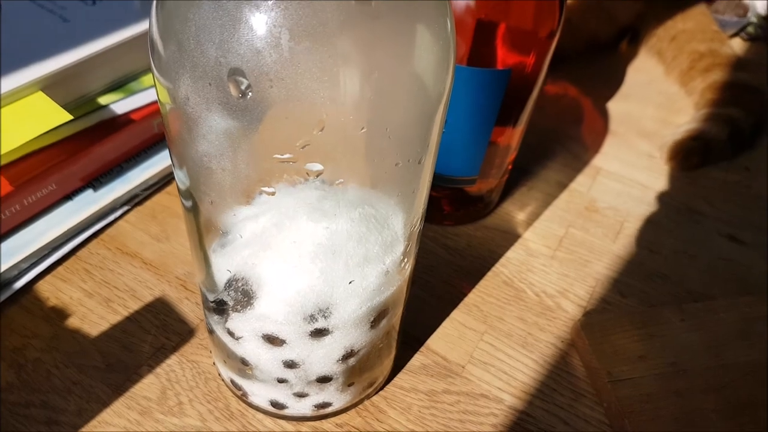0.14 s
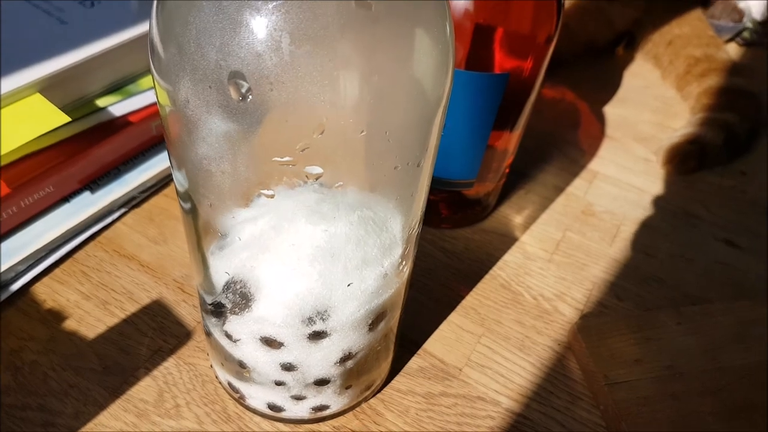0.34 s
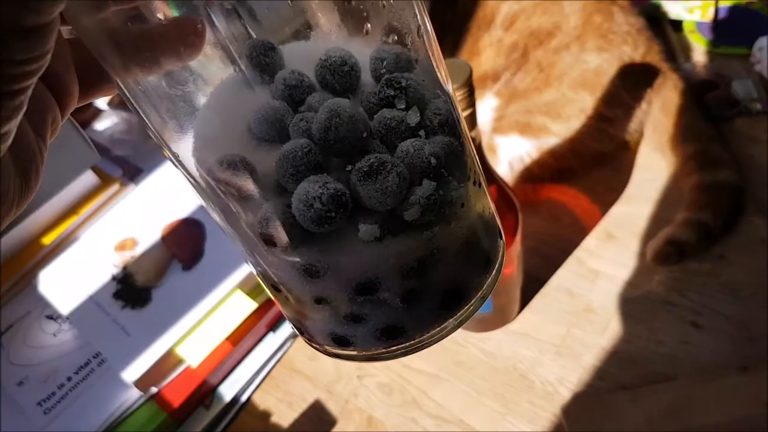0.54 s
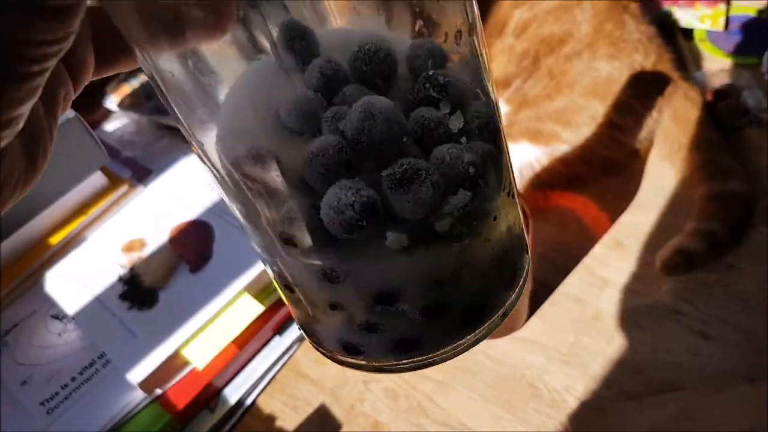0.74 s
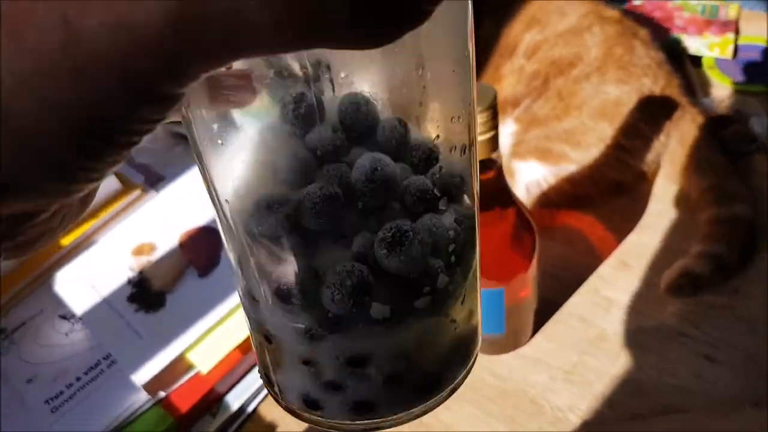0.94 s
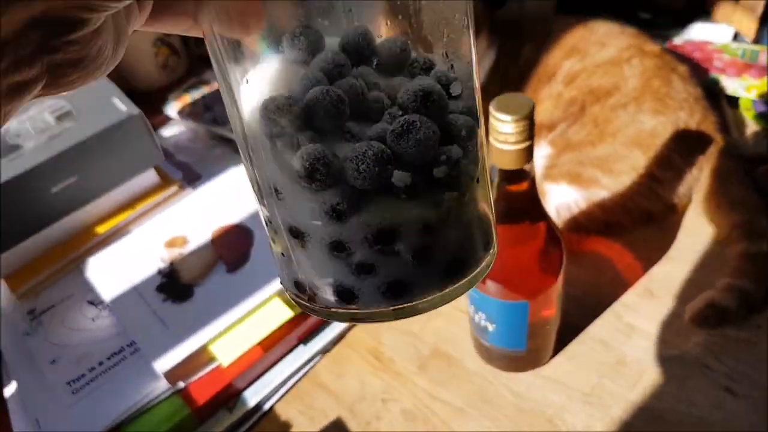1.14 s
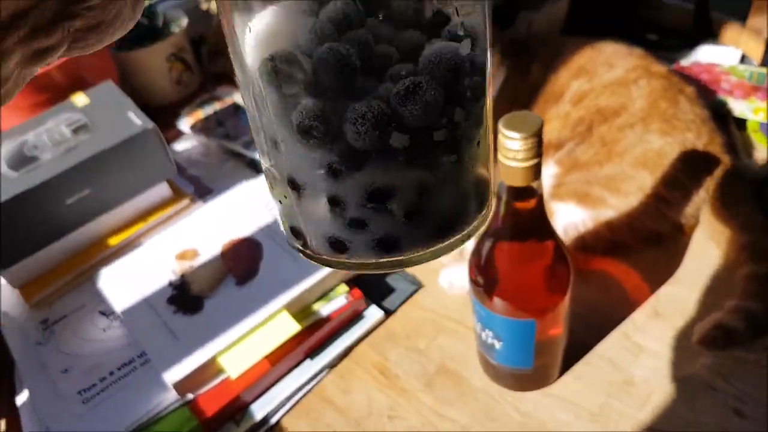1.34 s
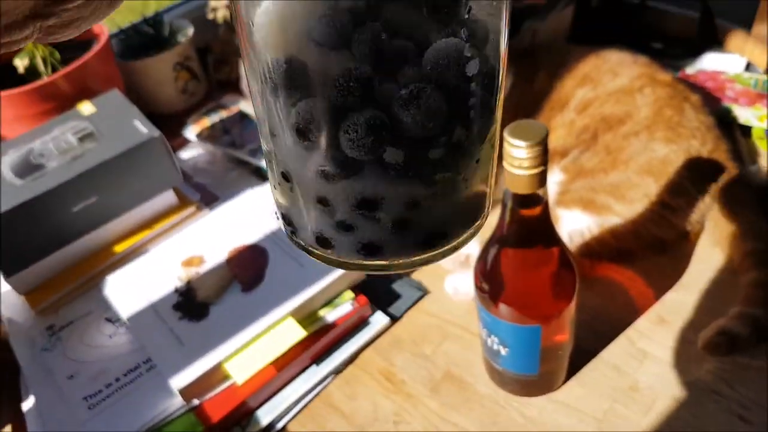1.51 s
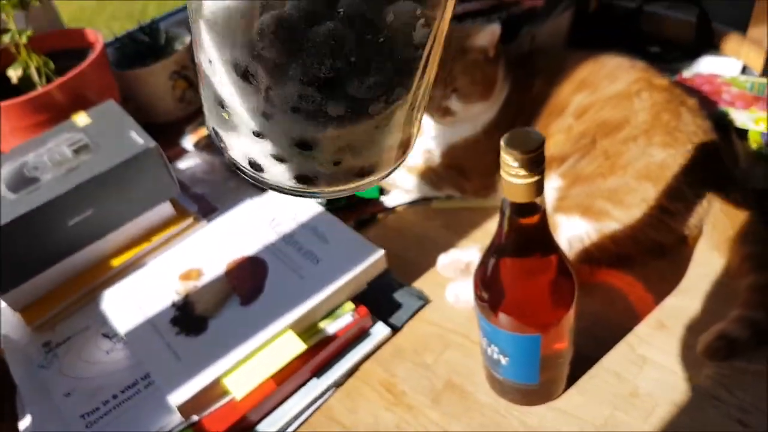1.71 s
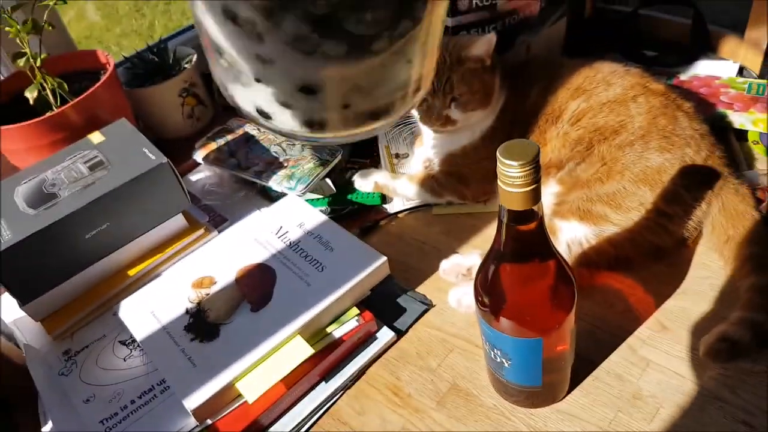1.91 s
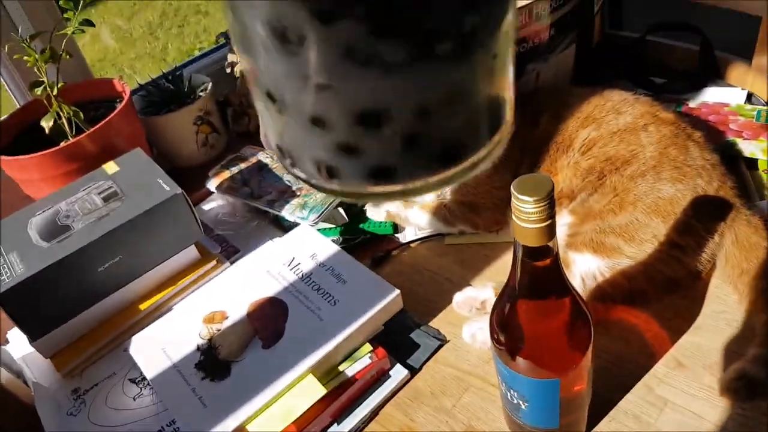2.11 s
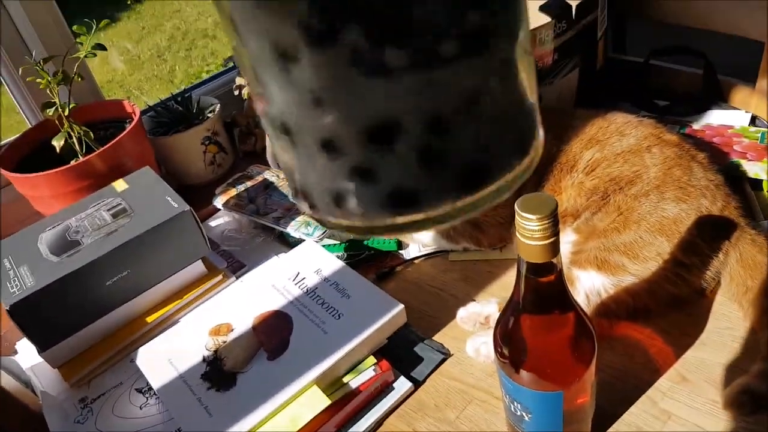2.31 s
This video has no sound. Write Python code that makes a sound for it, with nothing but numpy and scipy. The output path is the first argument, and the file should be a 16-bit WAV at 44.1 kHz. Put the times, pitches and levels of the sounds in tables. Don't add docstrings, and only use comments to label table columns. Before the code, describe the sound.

Frozen berries and sugar rattle and clink inside a glass bottle being shaken, close up indoors.

```python
import sys
import numpy as np
from scipy import signal
from scipy.fft import rfft, irfft
from scipy.io import wavfile
from scipy.ndimage import uniform_filter1d

SR = 44100
rng = np.random.default_rng(int(sys.argv[2]) if len(sys.argv) > 2 else 0)


def rack_gain(trim_db):
    fader = np.asarray(trim_db, float)
    return 10 ** (fader / 20)


def output_pcm(signal):
    pcm = np.clip(np.atleast_2d(signal).T, -1, 1) * 32767
    wavfile.write(sys.argv[1], SR, np.round(pcm).astype(np.int16))


N = 104164
TIME = np.arange(N) / SR

# pitch in Hz, level in dB per Hz.
CRACK_COLOUR = [(300, -23.5), (1200, 1.5), (3500, 7), (8000, -12), (10500, -10.5), (15500, -6.5)]


def evened(x):
    return x / np.sqrt(np.mean(x ** 2) + 1e-20)


def read(points, hz):
    point_hz, value = np.transpose(points)
    return np.interp(np.log(hz + 1), np.log(point_hz + 1), value)


def coloured(x, points):
    log_gain = np.log(rack_gain(read(points, abs(np.fft.fftfreq(2048, 1 / SR)))))
    spectrum = np.exp(np.conj(signal.hilbert(log_gain)))
    taps = np.fft.ifft(spectrum).real[:1024]
    return ringing(x, taps / np.linalg.norm(taps))


def ringing(pushes, shape):
    return signal.oaconvolve(pushes, shape)[:N]


def clicks(times, sizes):
    out = np.zeros(N)
    samples = np.round(np.asarray(times) * SR).astype(int)
    np.add.at(out, np.minimum(samples, N - 1), sizes)
    return out


def grains(per_s, spread_db):
    chance, sign, size = rng.random((N, 3)).T
    sizes = rack_gain(-spread_db * np.log(np.maximum(size, .02)))
    return evened((chance < per_s / SR) * np.sign(sign - .5) * sizes)


def activity():
    # start in seconds, level in dB, rise in seconds, time to fall 60 dB in seconds,
    # extra rattle high on the wall in dB.
    slides = [(0.714, -59, 0.0042, 0.82, -23), (0.864, -52.5, 0.008, 0.75, -31),
              (0.985, -27, 0.001, 0.039, 12.5), (1.006, -48, 0.0019, 0.45, 12),
              (1.078, -47.5, 0.022, 0.17, -5), (1.168, -45.5, 0.0035, 0.27, -24),
              (1.26, -46, 0.0032, 0.15, -29), (1.336, -43, 0.043, 0.33, -1.5),
              (1.492, -40.5, 0.0022, 0.19, -27), (1.55, -41.5, 0.0063, 0.28, -36),
              (1.606, -47.5, 0.0037, 0.38, 10.5), (1.702, -55, 0.015, 0.053, 0),
              (1.842, -40.5, 0.029, 0.13, 2), (1.941, -59, 0.0021, 0.6, 0), (2.018, -49, 0.0047, 0.18, -27),
              (2.053, -47.5, 0.0028, 0.25, -19), (2.079, -45.5, 0.00081, 0.38, 15),
              (2.208, -51, 0.0048, 0.35, 1.5), (2.252, -41.5, 0.003, 0.11, 2),
              (2.271, -46, 0.0034, 0.44, 8)]
    start, level_db, rise, t60, high_db = np.transpose(slides)[:, :, None]
    age = np.maximum(TIME - start, 0)
    swell = np.minimum(age / np.maximum(rise, .001), 1)
    fall = rack_gain(level_db - 60 * np.maximum(age - rise, 0) / t60)
    power = (swell * fall) ** 2
    total = power.sum(0)
    high = np.sqrt((power * rack_gain(2 * high_db)).sum(0) / (total + 1e-20))
    return np.sqrt(total), high


def wall(moving, high):
    # time in seconds, then middle, low and high ring in dB.
    clinks = [(0.7153, -48, -75, -90), (0.7234, -54, -75, -84), (0.739, -49, -68, -75),
              (0.7596, -44.5, -63, -70), (.762, -46, -53, -70), (0.77, -46, -77, -80),
              (0.7972, -38, -77, -69), (0.8539, -38, -77, -79), (.857, -35.5, -75, -78),
              (0.8683, -65, -70, -82), (0.886, -32, -45, -58), (.896, -55, -55, -83),
              (0.9804, -34.5, -52, -42), (0.9852, -19.5, -22, -21.5), (1.012, -47, -33, -34),
              (1.082, -41, -53, -52), (1.107, -45, -38.5, -65), (1.175, -37, -35, -58),
              (1.2626, -43, -45, -54.5), (1.304, -52, -62, -61), (1.354, -38, -35, -47),
              (1.377, -52, -38, -49), (1.382, -50, -44, -42), (1.406, -47, -56, -62),
              (1.455, -34, -61, -54), (1.4925, -64, -32, -46), (1.519, -50.5, -48, -61),
              (1.553, -46, -25.5, -43), (1.5602, -30, -29.5, -19.5), (1.574, -46, -30, -37.5),
              (1.596, -50, -48, -33), (1.6058, -37.5, -30, -34.5), (1.627, -56, -30.5, -50),
              (1.66, -40, -58, -62), (1.707, -42, -56, -65), (1.817, -55.5, -48.5, -69),
              (1.8467, -57, -55, -67), (1.856, -59, -43.5, -57), (1.8634, -35, -30, -34),
              (1.884, -57, -32, -67), (1.955, -57.5, -42.5, -64), (2.024, -44, -43, -78),
              (2.057, -37, -52, -76), (2.0837, -23, -21.5, -22.5), (2.177, -67, -46, -50),
              (2.208, -50, -71, -62), (2.259, -34, -59, -63), (2.2722, -32.5, -23, -28),
              (2.289, -41, -39.5, -47), (2.298, -42, -46, -48.5)]
    # pitch in Hz, level in dB, time to fall 60 dB in seconds.
    middle_modes = [(4536, -1.5, 0.035), (4563, -6, 0.012), (4640, -23, 0.013), (4674, -8.5, 0.019),
                    (3470, -19, 0.017), (12980, -20.5, .012), (15200, -15, 0.0033)]
    low_modes = [(2050, -15, .02), (2420, -14, .02), (2585, -4, .035), (2700, -12, .02), (3150, -21, .015)]
    high_modes = [(5730, -14, 0.0079), (5930, -6.5, 0.029), (6180, -15.5, 0.018), (6370, -1.5, 0.04),
                  (6436, -6.5, 0.024), (6460, -18, 0.0075), (7200, -27, 0.024), (9330, -17, 0.017)]
    base_modes = [(2245, -56, 0.12), (2390, -18.5, 0.18), (3840, -13, 0.016), (7480, -13, 0.02),
                  (7600, -15, 0.044), (8016, -11.5, 0.034), (8205, -10, 0.021), (8820, -22, 0.012)]
    ring_db = (0.033, 2.3, 3.57, 9.3)
    # time in seconds, base level in dB.
    tipping = [
        (1.2, -16),
        (1.5, -3),
        (2.05, 0.1),
    ]
    rattle_db = (6, -3, -3.5, -1)
    bounce_s, bounce_db = 0.001122, -5
    rise_s, scatter_db = .0003, 2.2
    contact_s, rings_on = 0.0045, 0.29
    split = .017

    rows, t, out = np.array(clinks), np.arange(4000) / SR, np.zeros(N)
    times = rows[:, 0]
    base_shown = rack_gain(np.interp(TIME, *np.transpose(tipping)))
    damped = rings_on + (1 - rings_on) * np.exp(-t / contact_s)
    free = TIME < .95
    for k, family in enumerate((middle_modes, low_modes, high_modes, base_modes)):
        shown = base_shown if family is base_modes else 1
        small = moving * grains(490, 0) * rack_gain(rattle_db[k]) * (high if k else 1)
        for hz, db, t60 in family:
            shape = rack_gain(db - 60 * t / t60) * (1 - np.exp(-t / rise_s))
            ring = shape * np.sin(2 * np.pi * hz * t)
            column = 2 if hz < 3000 else min(k + 1, 3)
            scatter = scatter_db * rng.standard_normal(len(rows))
            size = rack_gain(rows[:, column] + ring_db[k] + scatter)
            strikes = clicks(times, size) + clicks(times + bounce_s, size * rack_gain(bounce_db))
            out += ringing(strikes * shown * ~free, damped * ring)
            out += ringing(strikes * shown * free, ring)
            rattle = small * rng.standard_normal(N) / np.sqrt(t60 * SR / 5)
            lean = rng.integers(-1, 2, N)
            for side in (-1, 0, 1):
                shifted = shape * np.sin(2 * np.pi * hz * (1 + split * side) * t)
                out += ringing(rattle * (lean == side) * shown, shifted)
    return out + crack(times, rows[:, 3])


def crack(times, level_db):
    fade = np.exp(-np.arange(4000) / SR / 0.0061)
    burst = ringing(clicks(times, rack_gain(level_db - 4.5)), fade)
    return coloured(burst * rng.standard_normal(N), CRACK_COLOUR)


def thud(hz, cycles):
    turns = np.arange(1200) / SR * hz
    return np.sin(2 * np.pi * turns) * np.exp(-turns / cycles * 0.5)


def berries(moving):
    # time in seconds, peak in dB, pitch of the thud in Hz. The rows at 0.543 and 0.577 s are the
    thuds = [(0.449, -39.5, 394), (0.543, -52, 200), (0.577, -51, 322), (0.7606, -30.5, 675),
             (0.884, -32, 1437), (.985, -26, 1180), (1.012, -41, 1175), (1.109, -38.5, 945),
             (1.1766, -22, 933), (1.262, -43.5, 900), (1.377, -21, 1040), (1.3834, -22, 1285),
             (1.457, -39.5, 670), (1.4928, -26.5, 1310), (1.508, -32, 1100), (1.551, -36, 1240),
             (1.5605, -23, 1100), (1.607, -32.5, 1130), (1.629, -35, 980), (1.704, -42.5, 670),
             (1.793, -58, 1850), (1.8173, -44.5, 1280), (1.838, -39, 1540), (1.862, -39, 1090),
             (1.875, -43, 364), (1.953, -42.5, 890), (2.023, -43.5, 490), (2.055, -40, 1080),
             (2.084, -25.5, 790), (2.254, -34, 1100), (2.259, -48, 1260), (2.271, -23, 1050),
             (2.328, -38, 600)]
    times, peaks_db, _ = np.transpose(thuds)
    out = coloured(clicks(times, rack_gain(peaks_db - 15)), CRACK_COLOUR)
    for s, db, hz in thuds:
        part = out[round(s * SR):][:1200]
        part += rack_gain(db - 0.5) * thud(hz, 0.3)[:len(part)]
    for hz, db in ((330, -11), (600, -12.5), (1170, -3.5), (2000, 0.5)):
        knock = thud(hz, 0.71)
        patter = moving * grains(350 / 4, 2.3)
        out += ringing(patter, rack_gain(db - 6) * knock / np.linalg.norm(knock))
    return out


def sugar(moving):
    # pitch in Hz, level in dB per Hz.
    sugar_colour = [(300, -10.5), (1200, -6), (3500, 6), (5500, -4.5), (8000, -11.5), (10500, -12.5),
                    (14500, -10), (16000, -12)]
    clump_s, clump_db = .008, 2.5
    width, out = round(clump_s * SR), np.zeros(N)
    for hz in np.geomspace(600, 16000, num=14):
        turns = np.arange(600) / SR * hz
        ping = np.sin(2 * np.pi * turns) * np.exp(-np.pi * turns / 4.3)
        ping = ping * np.sqrt(hz) / np.linalg.norm(ping)
        drift = uniform_filter1d(rng.standard_normal(N), width)
        clumps = evened(uniform_filter1d(drift, width))
        out += ringing(evened(rack_gain(clump_db * clumps)) * grains(5000 / 4, 3), ping)
    return rack_gain(-1.5) * coloured(moving * evened(out), sugar_colour)


def ports(x, lag_s):
    # delay in seconds, level in dB.
    table_echo = [
        (.0011, -84),
        (.0027, -19.5),
    ]
    # pitch in Hz, left minus right in dB.
    left_over = [(60, 18), (180, -1), (550, 2), (1650, -0.5), (4500, 0), (6400, 4.5), (8200, 4), (15000, 2)]
    # pitch in Hz, lead of the left in radians.
    left_lead = [(400, 0.74), (1200, 1.1), (1700, 2.75), (2200, 3.52), (2600, 3.87), (4500, 4.4),
                 (6400, 4.54), (7600, 6), (14000, 5.7)]
    hz, z = np.fft.rfftfreq(N, 1 / SR), rfft(x)
    echoes = sum(rack_gain(db) * np.exp(-2j * np.pi * hz * s) for s, db in table_echo)
    z = z * (1 + echoes)
    lead = np.exp(.5j * read(left_lead, hz) - 1j * np.pi * hz * lag_s)
    tilt = rack_gain(read(left_over, hz) / 2) * lead
    return irfft(np.array([z * tilt, z / tilt]), N)


def sway(pair):
    # pitch in Hz, drift in radians.
    sway_turn = [(400, .2), (1200, .45), (3000, .55), (7000, .6), (11000, 1.7)]
    hz, _, z = signal.stft(pair, SR, nperseg=512, noverlap=384)
    field = rng.standard_normal((2,) + z.shape[1:])
    for size, axis in ((6, 1), (6, 1), (50, 2)):
        field = uniform_filter1d(field, size, axis)
    turn, lean = evened(field)
    balance = rack_gain(.5 * 2 * lean)
    tilt = np.exp(.5j * read(sway_turn, hz)[:, None] * turn) * balance
    return signal.istft(z * np.array([tilt, 1 / tilt]), SR, nperseg=512, noverlap=384)[1][:, :N]


def room(x):
    # pitch in Hz, time to fall 60 dB in seconds.
    room_t60 = [(300, 0.51), (2000, 0.4), (8000, 0.11)]
    taps = np.zeros((2, SR // 2))
    at = np.arange(300, SR // 2 - 20, 20)
    places = at + rng.integers(0, 20, (2, len(at)))
    np.put_along_axis(taps, places, rng.choice([-1., 1.], (2, len(at))), 1)
    hz, t, z = signal.stft(taps, SR, nperseg=256)
    fade = rack_gain(-60 * t / read(room_t60, hz)[:, None])
    tail = signal.istft(z * fade, SR, nperseg=256)[1]
    return signal.fftconvolve(x[None], tail / np.linalg.norm(tail[0]), axes=1)[:, :N]


def kitchen():
    # pitch in Hz, left-right likeness from -1 to 1.
    likeness = [(30, 1), (120, 0.15), (300, 0.91), (950, -0.23), (15000, 0.21)]
    # pitch in Hz, level in dB per Hz.
    hiss_colour = [(25, -18), (45, -10.5), (150, -11), (400, -9.5), (2000, -15.5), (5500, -29.5),
                   (9000, -33), (15500, -26.5)]
    # time in seconds, hum pitch in Hz, level in dB.
    hum_path = [
        (0, 222, -71),
        (.1, 225, -77),
        (.2, 221, -78.5),
        (.24, 223.6, -73),
        (.35, 220.8, -72),
        (.4, 214, -83),
    ]
    hz = np.fft.rfftfreq(N, 1 / SR)
    a, b = rfft(rng.standard_normal((2, N)))
    same = np.clip(read(likeness, hz), -1, 1)
    both = np.array([a, same * a + np.sqrt(1 - same ** 2) * b])
    hiss = irfft(both * rack_gain(read(hiss_colour, hz)), N)
    s, hum_hz, hum_db = np.transpose(hum_path)
    turn = 2 * np.pi * np.cumsum(np.interp(TIME, s, hum_hz)) / SR
    level = rack_gain(np.interp(TIME, s, hum_db, right=-110)) * np.sqrt(2)
    hum = level * (np.sin(turn) + rack_gain(-15) * np.sin(2 * turn))
    return rack_gain(-69) * hiss / np.std(hiss.mean(0)) + hum


def scene():
    moving, high = activity()
    cut = signal.butter(2, 278, "highpass", fs=SR, output="sos")
    glass, loose = signal.sosfilt(cut, [wall(moving, high), berries(moving) + sugar(moving)])
    direct = ports(glass, 0) + ports(loose, .00008)
    return sway(direct) + rack_gain(-16) * room(glass + loose) + kitchen()


def band_limit(x):
    return signal.sosfilt(signal.butter(12, 16650, fs=SR, output="sos"), x)


def record(dry):
    edge = signal.firwin(255, 15720, window=("kaiser", 5), fs=SR)
    limited = signal.oaconvolve(dry, edge[None], "same")
    return band_limit(limited)


dry = scene()
out = record(dry)
output_pcm(out)
```